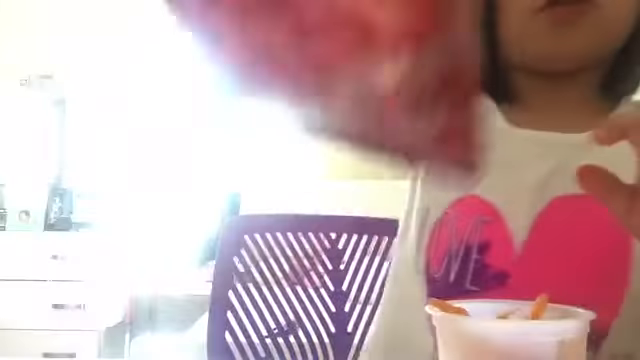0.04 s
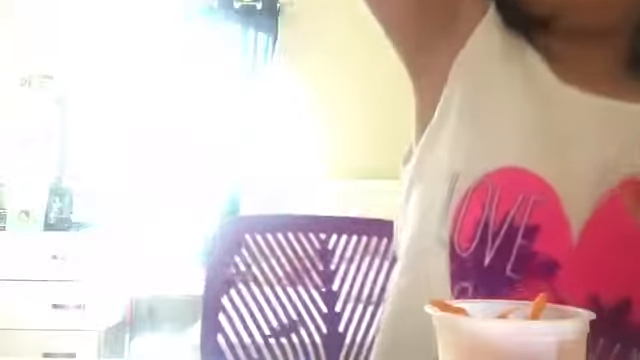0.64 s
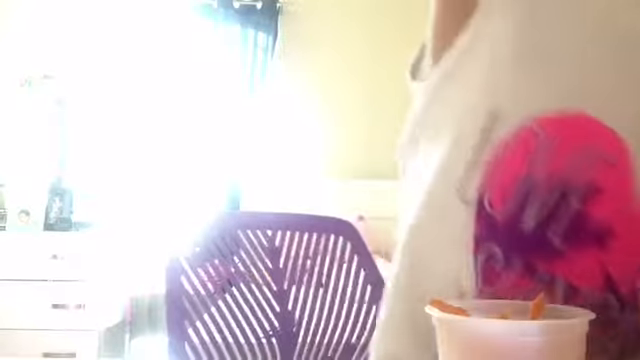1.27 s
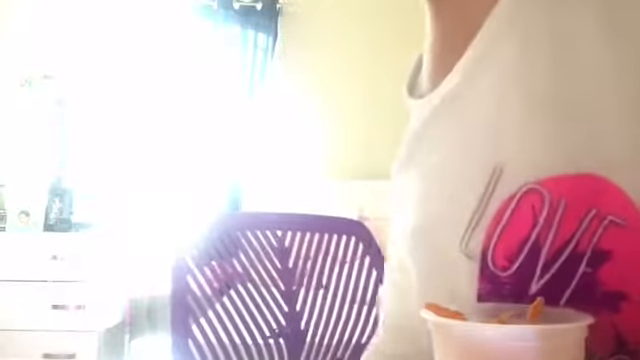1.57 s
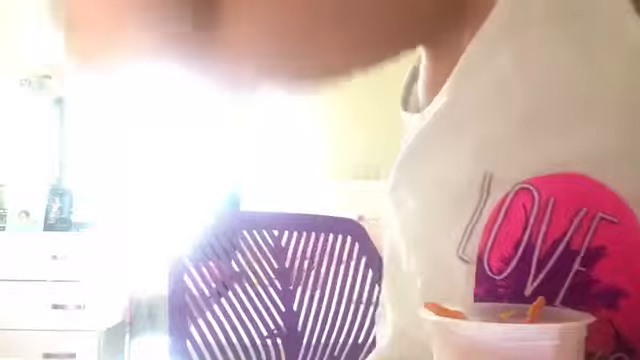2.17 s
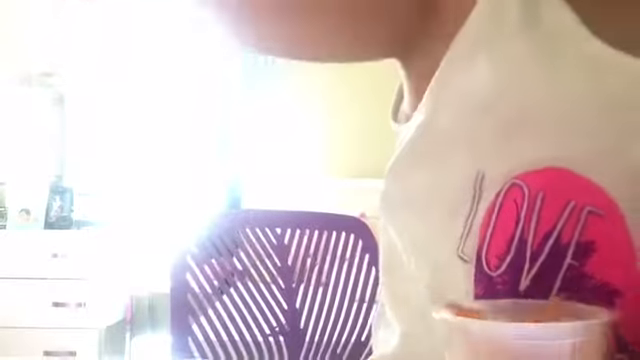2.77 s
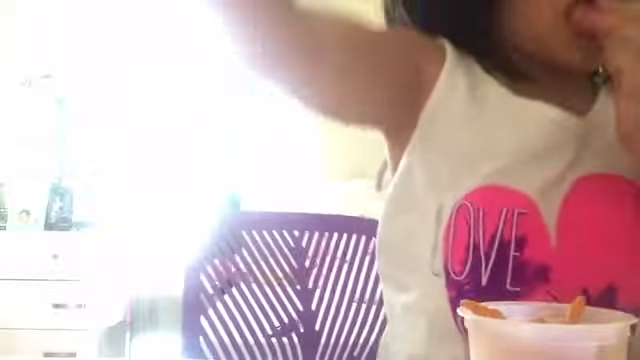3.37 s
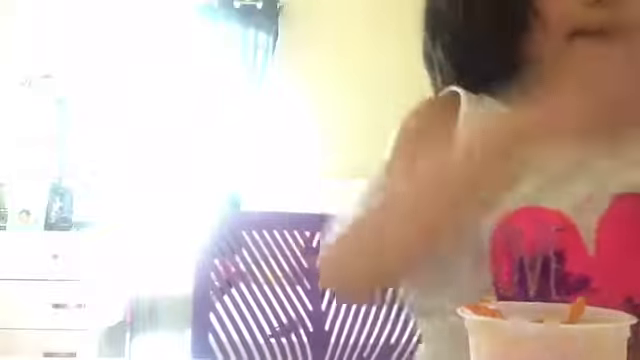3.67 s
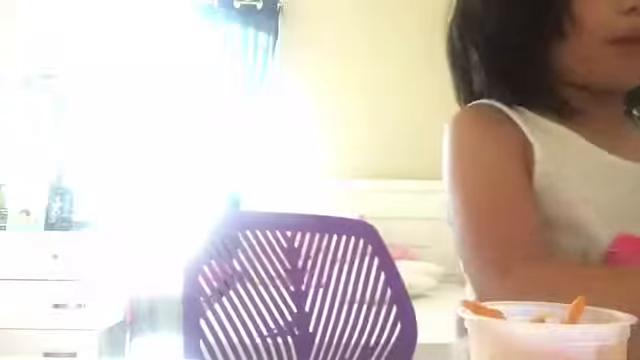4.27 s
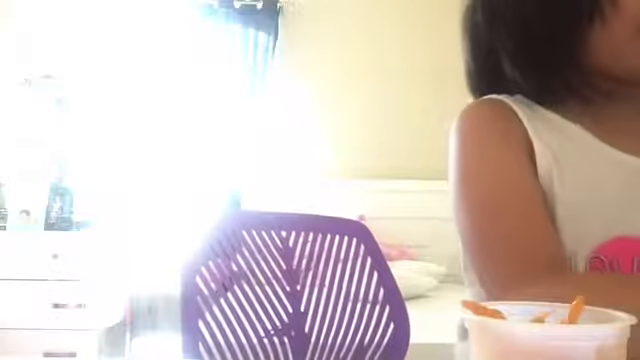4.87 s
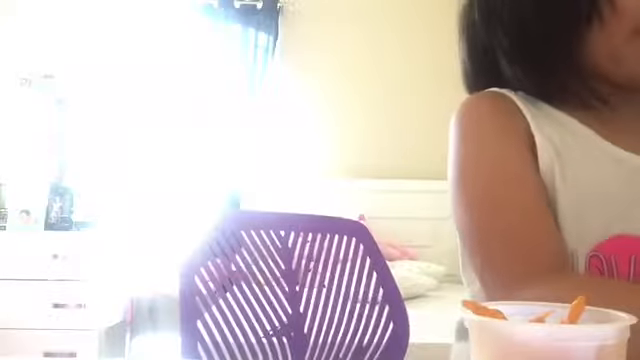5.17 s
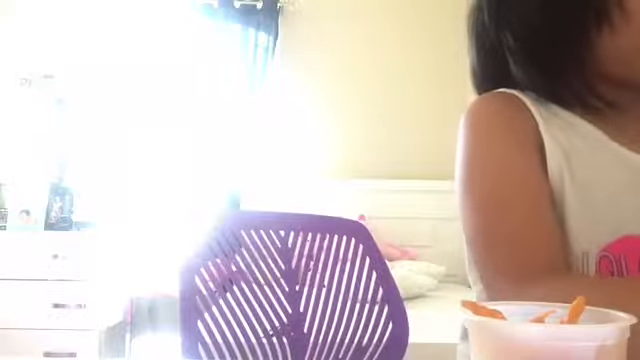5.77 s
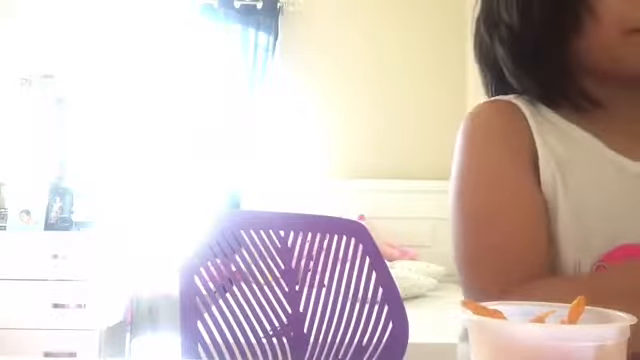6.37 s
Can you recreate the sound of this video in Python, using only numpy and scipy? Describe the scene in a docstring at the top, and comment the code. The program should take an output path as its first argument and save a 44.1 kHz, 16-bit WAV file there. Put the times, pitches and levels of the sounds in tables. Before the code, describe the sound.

In a quiet bedroom, a foil snack bag ticks and snaps lightly beside a small camera on a table. Then bag and hand brush against the microphone, making loud dry crackles, rumbling rubs and a cluster of thumps, followed by a short fingertip squeak. Afterwards the bag sounds softer and off to one side, with stray crinkles and a few sharp taps.

```python
"""A bedroom, with the microphone in a small camera on a table and a foil snack bag right beside it. Creases
snap in the foil, chips tick inside the bag, and the room answers. Then bag and hand brush the camera itself:
dry crackles, thumps through the case and the short stick-slip squeak of a fingertip. Later, with the bag off to
one side, come stray crinkles and a few taps."""
import sys
import numpy as np
from scipy import signal
from scipy.fft import rfft, irfft, next_fast_len
from scipy.io import wavfile
from scipy.ndimage import uniform_filter1d

SR = 44100
rng = np.random.default_rng(int(sys.argv[2]) if len(sys.argv) > 2 else 0)


def wrap_up_sound(samples):
    """Save the sound to the file named by the first command line argument, as 16-bit audio."""
    columns = np.atleast_2d(samples).T
    # keep every value between -1 and 1, then stretch to whole-number steps
    tamed = np.clip(columns, -1, 1)
    steps = np.round(tamed * 32767).astype(np.int16)
    wavfile.write(sys.argv[1], SR, steps)


N = 291942

# Colours of cracking foil, flexing foil, the rumbling case and dull rubbing noise.
# Each row: frequency in Hz, relative level in dB.
CRACK = [(2500, -26), (4500, 0), (8500, 0), (12000, -1), (15500, -6), (17000, -9.5)]
FLEX = [(70, -14.5), (230, 5.5), (480, -2.5), (900, -1), (1700, 1.5), (2600, -2), (3800, -2), (5500, -10.5),
        (9000, -48)]
RUMBLE = [(20, -38.5), (35, -16), (60, -3), (120, 3), (220, 1.5), (380, -10), (700, -14), (1500, -25.5),
          (4000, -60.5)]
DULL = [(150, -22.5), (350, 2), (600, 5), (1200, -6), (1700, -14.5), (3000, -28.5)]


def amp(db):
    return 10 ** (np.asarray(db) / 20)


def unit(x):
    return x / np.sqrt(np.mean(x ** 2) + 1e-20)


def along(points, hz):
    """Interpolate (Hz, value) points on a log frequency axis."""
    f, v = np.transpose(points)
    return np.interp(np.log(hz + 1), np.log(f), v)


def curves(rows):
    """One value per sample for each column after the time; -120 outside the rows."""
    s, *cols = np.transpose(rows)
    return [np.interp(np.arange(N) / SR, s, c, left=-120, right=-120) for c in cols]


def add(track, s, sound):
    """Lay a sound into a track at s seconds."""
    start = max(0, round(s * SR))
    part = sound[:max(0, N - start)]
    track[start:start + len(part)] += part


def coloured(x, spectrum):
    """Minimum-phase filter with the given (Hz, dB) colour."""
    size = 2 * next_fast_len(len(x) // 2 + 1024)
    cepstrum = irfft(np.log(amp(along(spectrum, np.fft.rfftfreq(size, 1 / SR)))))
    cepstrum[1:size // 2] *= 2
    cepstrum[size // 2 + 1:] = 0
    return irfft(rfft(x, size) * np.exp(rfft(cepstrum)))[:len(x)]


def struck(x, span):
    """Scale a short sound as if its energy filled span seconds at rms 1."""
    return x / np.sqrt(np.sum(x ** 2) / (span * SR) + 1e-20)


def grains(rate, spread_db, t60, smooth):
    """Tiny random bursts of uneven size, rate per second, over a share of smooth noise; rms 1."""
    sizes = amp(spread_db * np.minimum(rng.exponential(size=N), 3))
    bursts = sizes * (rng.random(N) < rate / SR)
    power = signal.lfilter([1], [1, -amp(-120 / (t60 * SR))], bursts ** 2)
    return unit(np.sqrt(power / power.mean() + smooth ** 2) * rng.standard_normal(N))


def room_air():
    """Room tone: quiet, steady and mostly bass."""
    # Each row: frequency in Hz, relative level in dB.
    colour = [(25, -15.5), (60, 0), (120, -0.5), (500, -13.5), (2000, -27.5), (8000, -30.5), (16000, -34.5)]
    return amp(-67.5) * unit(coloured(rng.standard_normal(N), colour))


def room(x):
    """The bedroom answers with a diffuse tail of energy 1; the bass lasts longest."""
    # Each row: frequency in Hz, t60 in seconds.
    decay = [(200, 0.65), (1000, 0.22), (5000, 0.3), (10000, 0.24), (16000, 0.3)]
    # Hollow resonances that colour every tail, in Hz.
    hollow_hz = [290, 690, 1100]
    hz, t, noise = signal.stft(rng.standard_normal(SR // 3), SR, nperseg=256)
    tail = signal.istft(noise * amp(-60 * t / along(decay, hz)[:, None]), SR, nperseg=256)[1]
    tail *= 1 - np.exp(-np.arange(len(tail)) / SR / 0.00071)
    tail += 1.5 * sum(signal.lfilter(*signal.iirpeak(f, 9, fs=SR), tail) for f in hollow_hz)
    return signal.fftconvolve(x, tail / np.linalg.norm(tail))


def movement():
    """Two levels in dB for every sample: how much the foil moves and how hard the hand drags."""
    # The bag is lifted, pressed against the camera and drawn away.
    # Each row: time in seconds, foil movement and drag on the case in relative dB.
    handling = [(0.0, -44.5, -57), (0.13, -60, -54), (0.31, -63.5, -60.5), (0.45, -72, -53),
                (0.69, -80, -89), (1.0, -60, -49.5), (1.07, -56, -51.5), (1.35, -60, -66.5),
                (1.43, -61.5, -48), (1.57, -53.5, -56), (1.63, -40, -41), (1.86, -45, -40),
                (1.99, -47, -37), (2.08, -67, -52), (2.17, -48.5, -42.5), (2.42, -30, -41.5),
                (2.46, -39.5, -55), (2.57, -34, -42.5), (2.73, -48.5, -47), (2.84, -46, -42),
                (2.94, -63, -45), (3.13, -57.5, -60), (3.35, -83.5, -85)]
    # Later the hand stirs in the bag.
    # Each row: start and length in seconds, foil movement and drag in relative dB.
    stirs = [(3.96, 0.23, -66, -63), (4.216, 0.24, -67.5, -82.5), (4.922, 0.03877, -60, -70),
             (5.196, 0.06, -63.5, -54.5), (5.905, 0.17, -63, -52.5)]
    rest_db, attack_s, t60 = -78, .025, 0.22  # the held bag is never quite still
    level, t = amp(curves(handling)) + amp(rest_db), np.arange(N) / SR
    for s, length, foil_db, drag_db in stirs:
        stir = np.clip((t - s) / attack_s, 0, 1) * amp(-60 * np.maximum(t - s - length, 0) / t60)
        level += amp([[foil_db], [drag_db]]) * stir
    return 20 * np.log10(level)


def rustle(foil_db, hiss_db, body_db, wet_db):
    """Countless small creases give way as the bag moves; pressed harder, it crackles more coarsely."""
    fine = grains(rate=1000, spread_db=8.0, t60=0.019, smooth=0.83)
    coarse = grains(rate=200, spread_db=4.2, t60=.004, smooth=.18)
    pressure = np.clip((foil_db + 62) / 12, 0, 1)
    crinkle = np.sqrt(1 - pressure) * fine + np.sqrt(pressure) * coarse
    hiss = amp(hiss_db) * unit(coloured(crinkle, CRACK))
    body = amp(body_db) * unit(coloured(crinkle, FLEX))
    foil = amp(foil_db) * (hiss + body)
    return foil + amp(wet_db) * room(foil)[:N]


def hand(drag_db, rumble_gain_db, scuff_gain_db):
    """Skin and foil drag over the case in small irregular slips."""
    # Skin catching on the case. Each row: time in seconds, relative level in dB.
    scuffing = [(2.15, -61), (2.26, -42), (2.32, -28), (2.396, -30.5), (2.462, -39.5), (2.56, -31.5),
                (2.69, -43), (2.765, -31), (2.83, -42), (2.88, -62), (2.95, -38.5), (3.19, -59.5),
                (3.33, -58)]
    heavy = grains(rate=160, spread_db=3, t60=.014, smooth=.6)
    light = grains(rate=160, spread_db=4, t60=.008, smooth=.25)
    rumble = amp(drag_db + rumble_gain_db) * unit(coloured(heavy, RUMBLE))
    scuff = amp(curves(scuffing)[0] + scuff_gain_db) * unit(coloured(light, DULL))
    return rumble + scuff


def facet(x, hz, gain):
    """Every stiff facet of foil favours its own pitch."""
    b, a = signal.iirpeak(np.clip(hz, 500, SR / 3), 2.5, fs=SR)
    return x + gain * signal.lfilter(b, a, x)


def creases(rows, crack_t60, flex_t60, span, lead_db, follow_s, follow_db, wet_db):
    """A crease cracks as it buckles and the foil around it flexes; a weak one leads, two follow."""
    out, t = np.zeros(N), np.arange(SR // 14) / SR
    lead_s = .006
    for s, db, flex_db, hz in rows:
        crack_noise, flex_noise = rng.standard_normal((2, len(t)))
        crack_hz = 9000 * np.exp(.35 * rng.standard_normal())  # tighter folds crack higher
        starts = lead_s + np.array([0, -lead_s / 2, follow_s, follow_s]) * rng.random(4)
        since = np.maximum(t - starts[:, None], 0)
        onsets = amp([[0], [lead_db], [follow_db], [follow_db]]) * (1 - np.exp(-since / 0.00039))
        envelope = lambda t60: np.linalg.norm(onsets * amp(-60 * since / t60), axis=0)
        crack = lambda x: amp(db) * struck(facet(coloured(x, CRACK), crack_hz, gain=0.71), span)
        flex = lambda x, gain: amp(db + flex_db) * struck(facet(coloured(x, FLEX), hz, gain), span)
        add(out, s - lead_s, crack(crack_noise * envelope(crack_t60)))
        add(out, s - lead_s, flex(flex_noise * envelope(flex_t60), gain=1.3))
        # the room gathers sound from every side of the bag, so its answer has an even colour
        click = signal.unit_impulse(len(t))
        add(out, s, amp(wet_db) * (room(crack(click)) + room(flex(click, gain=0.21))))
    return out


def snaps():
    """Creases snap a little way off the microphone, with plenty of room."""
    # Each row: start in seconds, crack in dB, flex in dB against the crack, facet pitch in Hz.
    folds = [(0.0059, -35.5, -3, 1960), (0.0675, -41.5, 3.5, 2970), (0.1632, -32, -1.5, 2800),
             (0.2007, -27.5, -2, 1480), (0.2737, -45, 10.5, 3930), (0.6425, -45.5, 5.5, 4400),
             (0.6559, -26, -4, 1620), (0.8834, -36.5, -5, 1090), (0.9683, -43, 1.5, 2600),
             (0.9978, -34, -2, 1800), (1.0112, -36, -5, 2420), (1.0373, -36.5, -12, 2600),
             (1.3652, -43, -1.5, 3540), (3.9784, -37, -12, 1930), (4.0252, -46, -1, 2120),
             (4.108, -47, 3, 2000), (4.1348, -42.5, -7, 2060), (4.3047, -56, 1, 3000),
             (4.372, -56.5, -17.5, 2964), (4.607, -38.5, 0, 2080), (4.936, -52.5, -2, 3180),
             (4.9554, -46, -1.5, 3210), (5.0827, -58, 5.5, 4300), (5.1118, -60, 11.5, 3400),
             (5.2089, -59, 4.5, 4670), (5.5158, -41.5, -19, 4000), (5.7251, -25, -2, 1050),
             (5.7517, -37.5, -13, 1600), (6.0051, -33, 7, 1620), (6.0797, -57.5, 17.5, 1180)]
    return creases(folds, crack_t60=.012, flex_t60=.024, span=.0079,
                   lead_db=-16, follow_s=.04, follow_db=-17, wet_db=-9)


def chip_ticks(t60, span, wet_db):
    """Chips knock against one another inside the bag: dull, muffled ticks."""
    # Each row: start in seconds, level in dB, pitch in Hz.
    ticks = [(0.047, -45, 1430), (0.083, -49, 1450), (0.105, -45, 1190), (0.121, -46.5, 2230),
             (0.14, -47, 3380), (0.326, -44.5, 1050), (0.348, -53, 2440), (0.373, -51, 1190),
             (0.427, -51.5, 1430), (0.4752, -50.5, 1530), (0.542, -55, 1310), (0.946, -43.5, 1650),
             (0.959, -44, 2070), (1.005, -44, 1440), (1.053, -42, 1070), (1.096, -43.5, 1220),
             (1.18, -48.5, 1460), (1.2363, -46.5, 3700), (1.3203, -46.5, 2430), (4.053, -52.5, 1910),
             (5.236, -48.5, 1215), (5.4087, -57, 1284), (5.452, -59.5, 1180)]
    out, t = np.zeros(N), np.arange(SR // 20) / SR
    for s, db, hz in ticks:
        tick = coloured(rng.standard_normal(len(t)) * amp(-60 * t / t60), FLEX)
        add(out, s, amp(db) * struck(facet(tick, hz, gain=1.8), span))
    return out + amp(wet_db) * room(out)[:N]


def ring(modes, t, detune, attack, span):
    """Damped modes; grip and point of contact shift them a little from blow to blow."""
    hz, db, t60 = np.transpose(modes)[:, :, None]
    pitch_shift, level_shift = rng.standard_normal((2, len(modes), 1))
    sign = (-1) ** np.arange(len(modes))[:, None]
    phase = 2 * np.pi * hz * np.exp(detune * pitch_shift) * t + rng.uniform(0, np.pi, hz.shape)
    waves = sign * amp(db + 2 * level_shift - 60 * t / t60) * np.sin(phase)
    return struck(waves.sum(0) * (1 - np.exp(-t / attack)), span)


def knocks(wet_db):
    """Bumps and taps reach the microphone through the solid case, dull and nearly dry."""
    # Each row: start in seconds, knock in dB, pitch in Hz (firmer is higher),
    # thud and clack in dB against the knock.
    blows = [(0.61, -52, 604, -12, -6), (0.656, -39.5, 160, -6, -27), (1.419, -43, 248, 15, -24),
             (1.867, -25.5, 259, -5.5, -7), (2.008, -32, 245, 2.5, -23), (2.226, -12.5, 191, -2.5, -16),
             (2.3242, -17, 820, -10, -12), (2.3431, -17, 610, 1, 0), (2.3861, -23, 610, 8, 5.5),
             (2.5267, -30, 505, -1, -2), (2.5938, -24, 383, -22, -8), (2.6191, -14, 642, -14, -15),
             (2.6669, -24, 525, -18, -1.5), (2.735, -31, 650, -27, 3.5), (2.7518, -20.5, 628, -18, 1),
             (2.7941, -22.5, 563, -41, -3.5), (2.8326, -25, 424, -38, -2.5), (3.1185, -41, 450, -26, -26),
             (3.1317, -35, 267, -23, -38), (3.1678, -31.5, 287, -10, -7.5), (3.186, -35.5, 292, -19, -29),
             (3.242, -31.5, 271, -18, -14), (3.2938, -33, 267, -9.5, -26), (3.3954, -41, 400, -12, -4),
             (4.2039, -45.5, 579, -22, 2), (4.2439, -41.5, 332, -9.5, -1), (4.7, -43, 257.4, -6.5, -11.5),
             (4.8305, -16.5, 342, -27, -1.5), (5.0703, -38.5, 363, -27.5, 0),
             (5.6909, -18.5, 292.6, -28.5, 1), (6.0105, -31, 259.5, -43, -20.5),
             (6.1884, -18.5, 318, -3, 3.5), (6.288, -66, 664, -7.5, -8), (6.3157, -62, 527, -2.5, 0.5),
             (6.3599, -62.5, 627, -11.5, 10), (6.407, -32.5, 293, -8.5, -3.5)]
    # The contact's bounce. Each row: multiple of its pitch, relative dB, t60 in cycles of that pitch.
    bounce = [(0.7, -12.5, 28), (1, 1, 10), (1.35, -6, 8.5), (1.901, -6.5, 2)]
    # The camera on its table rings low and high, then rocks back on its stand.
    # Each row: frequency in Hz, relative level in dB, t60 in seconds.
    thud_modes = [(68, -6, 0.085), (117, 1, 0.046)]
    clack_modes = [(723, 3.5, 0.017), (1083, 0.5, 0.028), (1270, -10.5, 0.024), (2010, -5, 0.0085)]
    rebound_modes = [(223, 2.5, 0.037), (287, 0, 0.039)]
    out, t = np.zeros(N), np.arange(SR // 6) / SR
    lead_s = .03
    for s, db, hz, thud_db, clack_db in blows:
        knock_modes = [(multiple * hz, level, cycles / hz) for multiple, level, cycles in bounce]
        knock = ring(knock_modes, t, detune=0.04, attack=0.7 / hz, span=0.023)
        thud = amp(thud_db) * ring(thud_modes, t, detune=.13, attack=.004, span=.014)
        clack = amp(clack_db) * ring(clack_modes, t, detune=0.065, attack=0.00088, span=0.0089)
        add(out, s, amp(db) * (thud + knock + clack))
        rebound = ring(rebound_modes, t, detune=0.033, attack=0.0066, span=0.075)
        add(out, s + .006, amp(db - 17.5) * rebound)
        # a brief dull noise swells before each knock and fades after it
        swell = unit(coloured(rng.standard_normal(len(t)), DULL)) * amp(-60 * abs(t - lead_s) / 0.039)
        add(out, s - lead_s, amp(db - 11) * swell)
    return out + amp(wet_db) * room(out)[:N]


def swishes():
    """The bag slides past, setting off a dense shower of creases and shaking the case."""
    # Each row: start in seconds, sizzle in dB, flex and rumble in dB against it,
    # rise and t60 in seconds.
    sweeps = [(1.414, -24.5, -0.5, 4, 0.0088, 0.29), (2.195, -30, -2, 1, 0.018, 0.071),
              (3.167, -41, -48, 8, 0.024, 0.17)]
    # Each row: frequency in Hz, relative level in dB.
    sizzle_colour = [(2500, -31), (4500, -11), (7500, -9.5), (9500, -7.5), (14500, -6.5), (17000, -19.5)]
    out, t = np.zeros(N), np.arange(SR // 2) / SR
    shower = grains(rate=900, spread_db=3.5, t60=.002, smooth=1)
    sizzle, flex, rumble = (unit(coloured(shower, colour)) for colour in (sizzle_colour, FLEX, RUMBLE))
    for s, db, flex_db, rumble_db, rise, t60 in sweeps:
        sweep = np.zeros(N)
        add(sweep, s, amp(db - 60 * np.maximum(t - 2 * rise, 0) / t60) * (1 - np.exp(-t / rise)))
        out += sweep * (sizzle + amp(flex_db) * flex + amp(rumble_db) * rumble)
    return out


def crackles():
    """Short dry cracks at the camera: foil creases, and later the clicks of taps on the case."""
    # Each row: start in seconds, crack in dB, its duller body in dB against it, body pitch in Hz.
    cracks = [(1.4922, -23.5, -11, 3000), (1.5985, -33.5, -2.5, 3500), (1.6214, -23.5, -5.5, 3000),
              (1.6311, -20, -11, 4500), (1.6425, -21, -7, 4500), (1.661, -33, -4, 3000),
              (1.6902, -34.5, 6.5, 2500), (1.71, -28.5, -2.5, 2210), (1.7328, -29.5, 9, 2070),
              (1.7389, -46, 6, 2800), (1.7565, -31, 1, 2000), (1.841, -39.5, 6, 4500),
              (1.868, -31, -2.5, 900), (1.8985, -30.5, 9, 2000), (1.929, -45, 8, 3000),
              (1.9462, -37.5, 5.5, 2800), (1.972, -46, 7.5, 3500), (2.0058, -36.5, -4.5, 3000),
              (2.1107, -42, 12, 2300), (2.156, -42.5, 1.5, 3550), (2.207, -28.5, 0, 2200),
              (2.3017, -16, -8.5, 2000), (2.3197, -16.5, 0.5, 1500), (2.3245, -17.5, 5.5, 1900),
              (2.3435, -17, 6, 1150), (2.3875, -25.5, 8.5, 900), (2.4223, -14, 0, 2500),
              (2.4279, -23.5, 2, 3800), (2.464, -31.5, 8.5, 1700), (2.4862, -29.5, 5.5, 3000),
              (2.5483, -34, 12, 4000), (2.5715, -28, 4.5, 4000), (2.5952, -30.5, 7, 2900),
              (2.6195, -16, -1.5, 1700), (2.668, -39.5, 14, 1600), (2.7575, -21, 3, 1500),
              (2.784, -28.5, -6, 1200), (2.8026, -23.5, -1.5, 4000), (2.8315, -24, 6, 1100),
              (2.871, -39, 2, 1500), (2.9492, -26, -9, 2000), (3.3949, -54.5, 16, 1100),
              (4.8305, -27.5, -1.5, 1200), (5.6916, -33.5, 7, 1000), (6.1912, -19, 0, 1696),
              (6.2207, -54, 10.5, 1500)]
    return creases(cracks, crack_t60=.005, flex_t60=.01, span=.0033,
                   lead_db=-22, follow_s=.02, follow_db=-20, wet_db=-29)


def squeak():
    """For a moment a sliding fingertip sticks and slips regularly on the case."""
    # Each row: time in seconds, slip rate in Hz, level in dB.
    slide = [(3.005, 542, -28), (3.022, 548, -33), (3.032, 398, -30), (3.055, 437, -26.5),
             (3.068, 470, -32), (3.078, 508, -27.5), (3.088, 470, -78)]
    # Each row: frequency in Hz, relative level in dB.
    finger_colour = [(200, -19), (440, -3), (900, -9.5), (1400, -11.5), (1900, -29), (2400, -27),
                     (3500, -41), (9000, -40)]
    hz, db = curves(slide)
    unsteady = 1 + .08 * unit(uniform_filter1d(rng.standard_normal(N), size=100))
    cycles = np.cumsum(np.maximum(hz, 0) * unsteady) / SR
    slips = np.diff(np.floor(cycles), prepend=0)
    tone = coloured(slips, finger_colour)
    return amp(db) * tone / np.std(tone[hz > 0])


def off_axis(bag, from_s):
    """Moved to the side of the microphone, the bag sounds fuller and loses its top."""
    # Each row: frequency in Hz, gain in dB.
    side_colour = [(2000, 4), (9000, 3), (12000, -5.5), (16000, -3)]
    return np.where(np.arange(N) < from_s * SR, bag, coloured(bag, side_colour))


def scene():
    """Bag, camera case and room tone, heard by one microphone."""
    foil_db, drag_db = movement()
    bag = snaps() + crackles() + chip_ticks(t60=.02, span=.0079, wet_db=-13)
    bag += rustle(foil_db, hiss_db=-4.5, body_db=-3.5, wet_db=-13) + swishes()
    case = knocks(wet_db=-39.5) + hand(drag_db, rumble_gain_db=3.5, scuff_gain_db=3.0) + squeak()
    return (off_axis(bag, from_s=3.6) + case + room_air())[None]


def record(dry):
    """The microphone sheds deep bass, overloads on the hardest blows and cuts off the very top."""
    low_hz, top_hz, overload = 40, 16300, .85
    lean = signal.sosfilt(signal.butter(3, low_hz, "highpass", fs=SR, output="sos"), dry)
    clipped = np.clip(lean, -overload, overload)
    size = next_fast_len(N + SR // 2)
    hz = np.fft.rfftfreq(size, 1 / SR)
    return irfft(rfft(clipped, size) / np.sqrt(1 + (hz / top_hz) ** 200), size)[..., :N]


dry = scene()
out = record(dry)
wrap_up_sound(out)
```